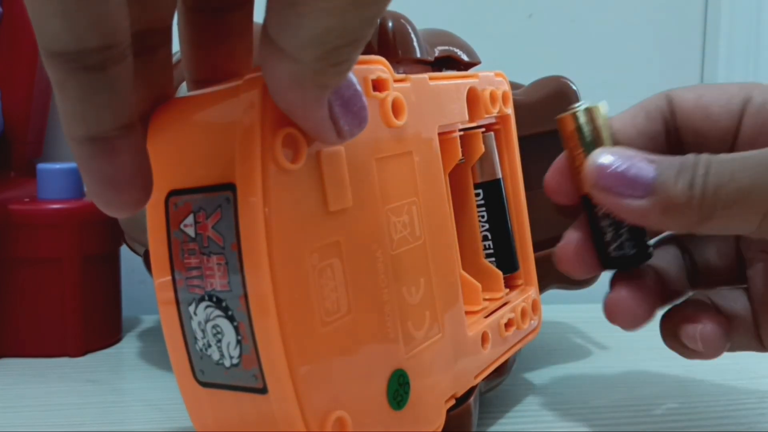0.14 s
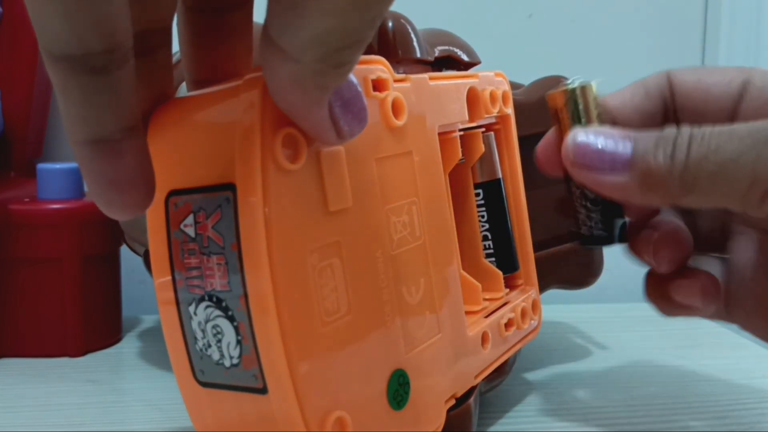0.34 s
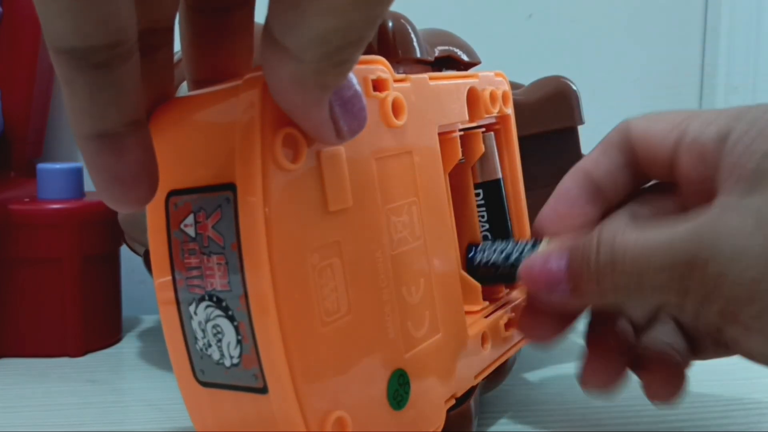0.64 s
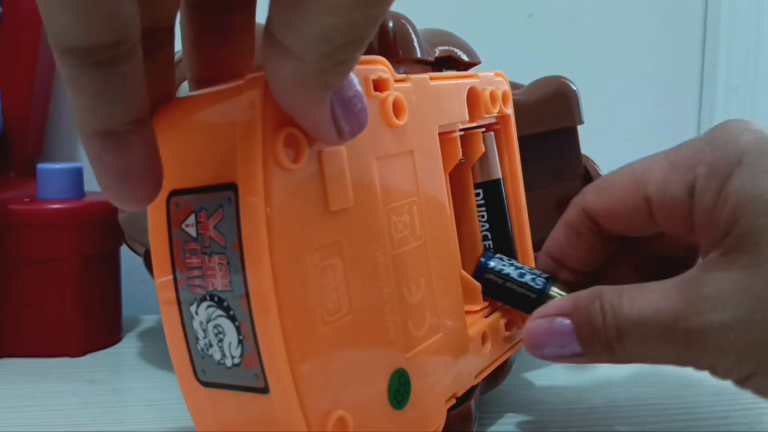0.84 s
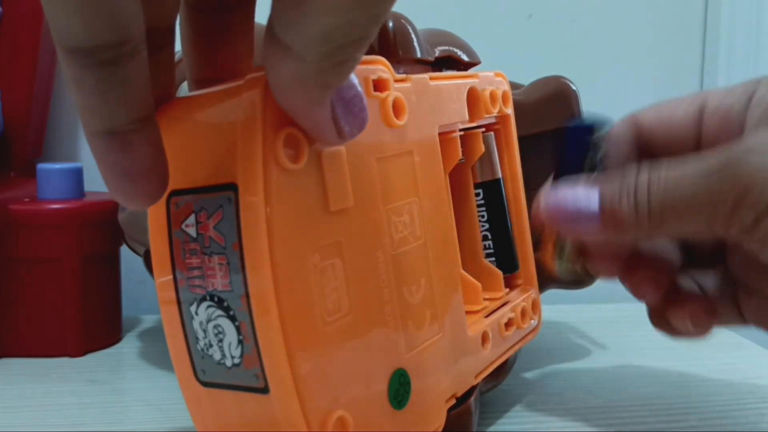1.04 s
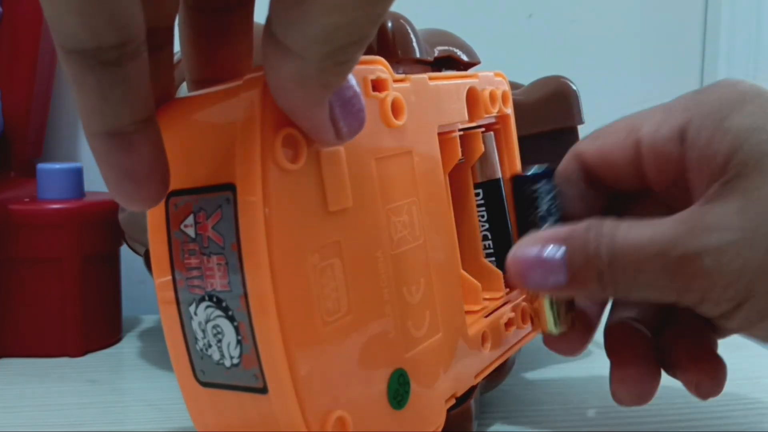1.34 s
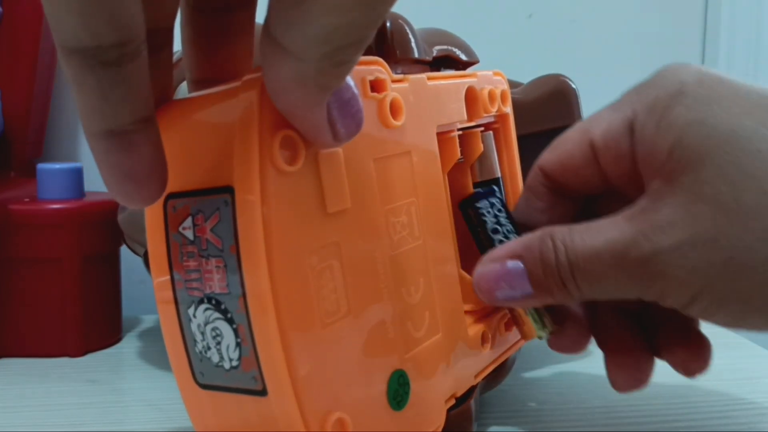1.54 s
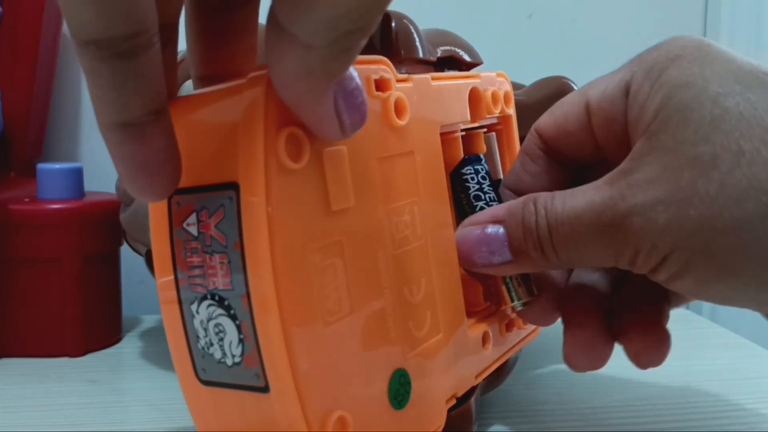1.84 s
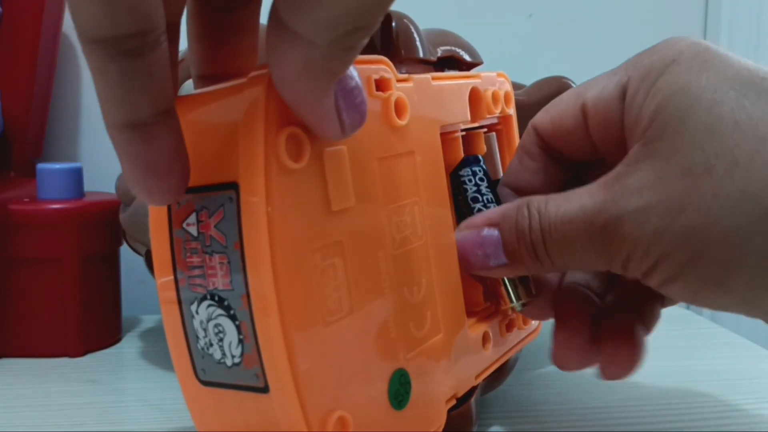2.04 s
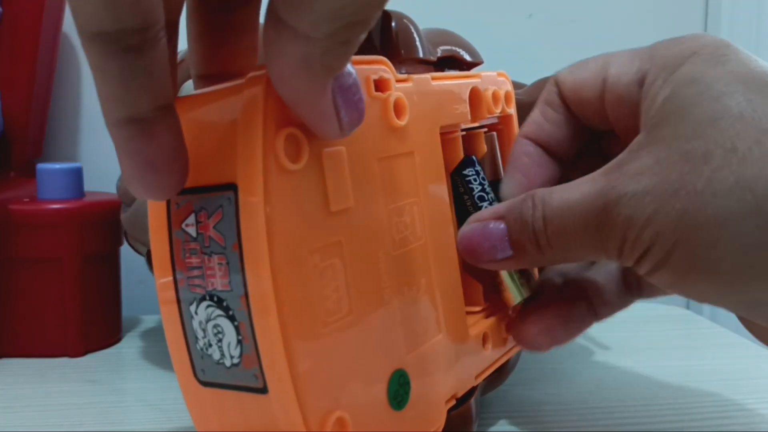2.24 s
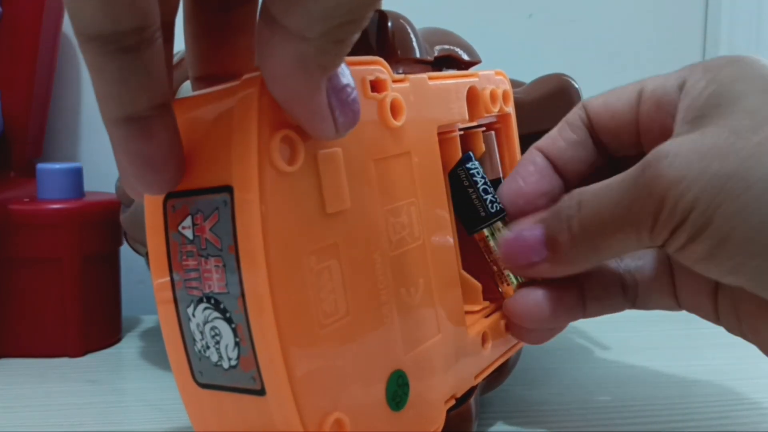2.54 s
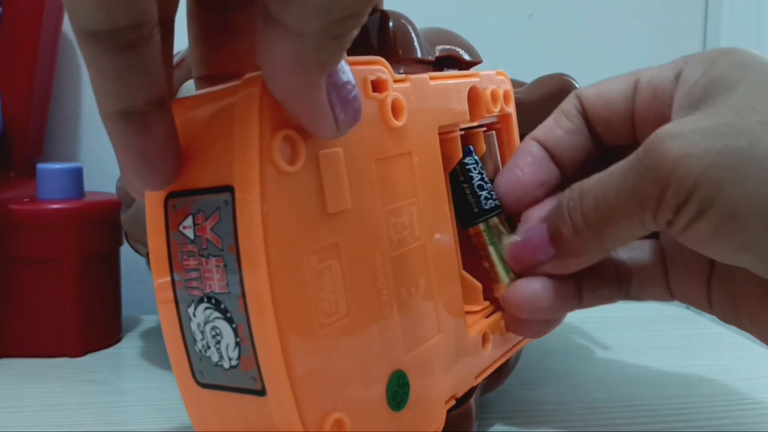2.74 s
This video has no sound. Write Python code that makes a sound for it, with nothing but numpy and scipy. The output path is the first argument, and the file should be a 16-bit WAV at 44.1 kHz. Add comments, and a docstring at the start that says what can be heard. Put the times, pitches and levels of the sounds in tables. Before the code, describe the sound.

A battery taps, scrapes and snaps into a hollow plastic toy in a small room.

```python
"""A small room: a battery is fumbled into a hollow plastic toy, close to the microphone.
Its metal can taps and scrapes on the ribs, ringing the plastic, and snaps past the contact spring.
Fingers shift and rub on the shell, and the toy knocks on the table with a thud and a hollow boom.
Behind it, a faint low hum swells and fades over quiet room air."""
import sys
import numpy as np
from scipy import signal
from scipy.fft import rfft, irfft
from scipy.io import wavfile
from scipy.ndimage import uniform_filter1d

SR = 44100
rng = np.random.default_rng(int(sys.argv[2]) if len(sys.argv) > 2 else 0)


def dump(signal):
    """Clip the signal to [-1, 1] and save it as 16-bit WAV at the path in sys.argv[1]."""
    limited = np.clip(np.atleast_2d(signal).T, -1, 1)
    pcm = np.round(limited * 32767).astype(np.int16)
    wavfile.write(sys.argv[1], SR, pcm)


N = 127890
TIME = np.arange(N) / SR
HUM_HZ = 101.5
CONTACT_S = 0.001294   # mean time over which the plastic smears a click

# Table levels are relative.
# battery strikes: (time [s], shell [dB], compartment walls [dB], ribs [dB], metal contact [dB])
STRIKES = [(0.242, -82, -70, -69.5, -56), (0.503, -43, -49, -48, -58), (0.5212, -28, -58, -34, -27),
           (0.5409, -31, -35, -34, -35), (0.545, -22.5, -34, -39, -30.5), (0.549, -23, -29, -31, -33),
           (0.671, -39.5, -40, -58, -61), (0.68, -45.5, -43.5, -64, -71), (0.7704, -36, -38.5, -56, -52.5),
           (0.7751, -28, -45, -73, -65), (0.7975, -45, -28, -37.5, -44), (0.8459, -52.5, -74, -60, -51.5),
           (1.447, -38.5, -39.5, -53, -53.5), (1.611, -48, -47, -55, -54), (1.7501, -52, -48, -54, -51),
           (1.87, -55, -38, -41, -38.5), (1.971, -59, -48.5, -59, -62), (2.004, -56, -45, -58, -65),
           (2.093, -45, -39, -41.5, -54), (2.1142, -15, -18, -28.5, -27), (2.124, -20, -49, -27.5, -25),
           (2.1365, -8, -14, -26, -20.5), (2.284, -45.5, -43, -57.5, -60.5), (2.3894, -41.5, -44, -70, -53),
           (2.4935, -60, -40, -55.5, -58), (2.5577, -65, -51.5, -39, -34),
           (2.6394, -37.5, -28.5, -36, -34.5), (2.645, -31.5, -33, -51, -35.5),
           (2.6497, -23, -36.5, -44, -53), (2.723, -33, -75, -69, -75), (2.7314, -30.5, -36, -45, -44),
           (2.863, -46, -46, -64, -78)]


def from_db(db):
    """Decibels to gain."""
    return 10 ** (np.asarray(db) / 20)


def rms_one(x):
    """Scale to rms 1."""
    return x / np.sqrt(np.mean(x ** 2) + 1e-20)


def unit_energy(x):
    """Scale each channel to energy 1."""
    return x / np.sqrt(np.sum(x ** 2, axis=-1, keepdims=True) + 1e-20)


def peak_one(x):
    """Scale the strongest 4 ms to rms 1."""
    return x / np.sqrt(uniform_filter1d(x ** 2, size=176).max())


def at_hz(points, hz):
    """Read a table on a log-frequency axis."""
    knots_hz, values = np.transpose(points)
    return np.interp(np.log(np.maximum(hz, 1)), np.log(knots_hz), values)


def band(x, low_hz, high_hz, order=2):
    """Causal band-pass."""
    return signal.sosfilt(signal.butter(order, [low_hz, high_hz], "band", fs=SR, output="sos"), x)


def decay(t, t60_s):
    """Exponential decay, 60 dB in t60_s."""
    return np.exp(-np.log(1000) * t / t60_s)


def drift(rate_hz):
    """Slow random wander, rms 1."""
    hz = np.arange(N // 2 + 1) * SR / N
    return rms_one(irfft(rfft(rng.standard_normal(N)) / (1 + (hz / rate_hz) ** 2), N))


def add(track, start_s, sound):
    """Mix a sound into a track."""
    i = max(int(start_s * SR), 0)
    track[i:i + len(sound)] += sound[:max(N - i, 0)]


def struck(modes, t, spread_db=2.5):
    """Decaying modes, their strengths varying from blow to blow."""
    strengths = from_db(rng.normal(0, spread_db, len(modes)))
    return sum(gain * from_db(db) * np.sin(2 * np.pi * hz * t) * decay(t, t60_s)
               for gain, (hz, db, t60_s) in zip(strengths, modes))


def smear(mean_delay_s, size=1024):
    """Bending waves spread a click: each frequency arrives at its own time."""
    knots = np.abs(1 + 0.536 * rng.standard_normal(size // 32))
    positions = np.linspace(0, len(knots) - 1, size // 2 + 1)
    delay_s = mean_delay_s * np.interp(positions, np.arange(len(knots)), knots)
    return irfft(np.exp(-2j * np.pi * np.cumsum(delay_s) * SR / size))[:size // 2]


def placed(x, pan_db, lag_s=0.001):
    """Pan (positive is left); sound reaches the farther, left microphone port later."""
    left, right = unit_energy(from_db([pan_db / 2, -pan_db / 2])) * np.sqrt(2)
    return np.array([left * np.interp(TIME - lag_s / 2, TIME, x),
                     right * np.interp(TIME + lag_s / 2, TIME, x)])


def in_room(x, hz, pan_db, room_db):
    """Direct sound, dense early reflections and a weaker late tail."""
    # late tail: (frequency [Hz], t60 [s])
    tail_t60 = [(200, 0.15), (1000, 0.43), (4000, 0.22), (12000, 0.24)]
    early_t60_s, late_db, build_s = 0.14, -18, 0.008
    t = TIME[:SR // 2]
    envelope = decay(t, early_t60_s) + from_db(late_db) * decay(t, at_hz(tail_t60, hz))
    envelope *= np.minimum(t / build_s, 1) ** 2
    echoes = unit_energy(rng.standard_normal((2, len(t))) * envelope)
    direct = placed(x, pan_db)
    return direct + from_db(room_db) * signal.fftconvolve(direct, echoes, axes=1)[:, :N]


def stereo_noise(spectrum, hum_dip_db=0):
    """Coloured noise, alike on both sides in the bass, with an optional dip at the hum."""
    # left-right likeness: (frequency [Hz], correlation [0..1])
    likeness = [(40, 0.3), (120, 1), (300, 0.074), (1000, .02), (10000, .02)]
    hz = np.arange(N // 2 + 1) * SR / N
    mid, side = rfft(rng.standard_normal((2, N)))
    alike = at_hz(likeness, hz)
    pair = np.sqrt(1 + alike) * mid + np.sqrt(1 - alike) * side * [[1], [-1]]
    dip_db = hum_dip_db * np.exp(-((hz - HUM_HZ) / 35) ** 2)
    return rms_one(irfft(from_db(at_hz(spectrum, hz) + dip_db) * pair, N))


def air():
    """Steady, bass-heavy room noise."""
    # room air: (frequency [Hz], density [dB])
    spectrum = [(15, -50.5), (25, -17), (64, -20), (78, -6), (102, 2.5), (141, -21), (270, -21.5),
                (326, -23.5), (607, -35.5), (1400, -38), (2110, -45), (4370, -47.5), (6920, -53.5),
                (9070, -46.5), (16000, -65)]
    return from_db(-61) * stereo_noise(spectrum, hum_dip_db=-17)


def hum():
    """A low hum swells and fades, with faint wavering tones above it."""
    # hum envelope, two consecutive runs of (time [s], level [dB])
    swells = [
        [(0.0, -59.5), (0.42, -56), (0.492, -81), (0.56, -53), (0.766, -67), (0.834, -51), (0.918, -46.5),
         (1.102, -78.5), (1.118, -58), (1.394, -46), (1.44, -95)],
        [(1.46, -65), (1.56, -60.5), (1.924, -53.5), (1.964, -82), (2.092, -70), (2.136, -48.5), (2.354, -52.5),
         (2.382, -59.5), (2.618, -65), (2.778, -55.5), (2.9, -64)],
    ]
    # room tones: (frequency [Hz], level [dB], width [Hz])
    tones = [(210.7, -75, 20), (261, -61.5, 6.8), (302, -70, 4.7), (580, -69.5, 14), (4300, -82, 36)]
    wander_hz = 1.076 * drift(2.44)
    phase = 2 * np.pi * np.cumsum(HUM_HZ + wander_hz) / SR
    level_db = np.interp(TIME, *np.vstack(swells).T) - 0.5
    out = np.sqrt(2) * np.sin(phase) * from_db(level_db)
    for hz, db, width_hz in tones:
        angle = 2 * np.pi * hz * TIME
        out += from_db(db) * (drift(width_hz) * np.sin(angle) + drift(width_hz) * np.cos(angle))
    return placed(out, pan_db=7.5)


def fingers():
    """Fingers shift on the hollow toy: a low, uneven rustle."""
    # handling envelope: (time [s], level [dB])
    envelope = [(0, -73.5), (1.45, -71.5), (1.66, -53), (1.8, -63.5), (1.97, -62), (2.3, -53), (2.5, -75),
                (2.74, -59.5), (2.9, -58)]
    # handling noise: (frequency [Hz], density [dB])
    spectrum = [(60, -22.5), (105, -4), (150, -3), (225, -2), (400, -13.5), (600, -13), (900, -19),
                (1500, -25.5), (6000, -48.5)]
    rustle = stereo_noise(spectrum)
    flutter_db = 1.8 * drift(25)
    return rustle * from_db(np.interp(TIME, *np.transpose(envelope)) + flutter_db)


def bumps():
    """Pushes from battery and fingers knock the toy on the table: low thud, hollow boom."""
    # table knocks: (time [s], thud [dB], boom [dB])
    knocks = [(.546, -35, -38.5), (.556, -39, -44.5), (0.675, -53, -54), (0.777, -49.5, -46),
              (1.456, -69, -50.5), (1.611, -52, -66), (1.657, -57, -62), (1.76, -54, -51),
              (1.885, -76, -51.5), (2.115, -47.5, -51), (2.141, -37.5, -35), (2.293, -56, -48),
              (2.399, -83, -66), (2.578, -60, -46.5), (2.653, -66, -49.5), (2.728, -49, -57.5)]
    # modes of the toy on the table: (frequency [Hz], level [dB], t60 [s])
    modes = [(157, -9.5, 0.085), (213.4, 1, 0.093), (270.4, -7, 0.18), (347, -1, 0.057), (437, -4, .06),
             (522, -1.5, 0.049), (587, 0, 0.069), (674, -3, 0.03), (800, 0, 0.039)]
    split_hz = 400
    thud_modes = [mode for mode in modes if mode[0] < split_hz]
    boom_modes = [mode for mode in modes if mode[0] >= split_hz]
    thuds, booms = np.zeros((2, N))
    t = TIME[:SR // 3]
    for time_s, thud_db, boom_db in knocks:
        add(thuds, time_s, from_db(thud_db + 4.5) * struck(thud_modes, t))
        add(booms, time_s, from_db(boom_db - 1) * struck(boom_modes, t))
    return (in_room(band(thuds, 120, split_hz, order=3), hz=213.4, pan_db=6.5, room_db=-0.5)
            + in_room(band(booms, split_hz, 990), hz=split_hz, pan_db=3, room_db=2.5))


def spring():
    """The contact spring pings faintly when the battery catches it."""
    # spring plucks: (time [s], level [dB])
    plucks = [(1.871, -57), (2.4938, -50.5), (2.5561, -43.5)]
    # spring modes: (frequency [Hz], level [dB], t60 [s])
    modes = [(2060, -0.5, 0.134), (2820, 0.5, 0.055), (3200, 3.5, 0.067), (3395, 0.5, 0.087),
             (3820, -2, 0.057), (5350, -9, 0.068)]
    out = np.zeros(N)
    for time_s, db in plucks:
        ping = signal.fftconvolve(struck(modes, TIME[:SR // 6]), smear(CONTACT_S))
        add(out, time_s, from_db(db) * ping)
    return in_room(band(out, 1500, 5700), hz=3200, pan_db=-1, room_db=-13.5)


def cracks():
    """The harder the metal strikes, the more of its energy lies in the top treble."""
    low_hz, pivot_db, growth = 11250, -23, 0.62
    out = np.zeros(N)
    for time_s, *_, metal_db in STRIKES:
        db = metal_db - 14.5 + growth * (metal_db - pivot_db)
        click = band(smear(mean_delay_s=0.0025), low_hz, 1.25 * low_hz)
        add(out, time_s, from_db(db) * peak_one(click))
    return in_room(out, low_hz, pan_db=-12.5, room_db=-14)


def ringing(low_hz, high_hz, dense_db, dense_t60_s):
    """Impulse response of one part of the toy: its modes plus a short dense ring."""
    # toy modes: (frequency [Hz], level [dB], t60 [s])
    toy_modes = [(735, -13.5, .05), (843.5, -7.5, 0.092), (879, 15, 0.014), (939.6, 4, 0.043),
                 (1080.6, -15.5, 0.15), (1260, -5.5, 0.057), (1822, -2, 0.026), (1955, 13, .011),
                 (1949, -10.5, 0.056), (2166, -11.5, 0.04), (2370, -2, 0.023), (3530, -4, 0.015),
                 (4404, -3, 0.035), (5114, 7, 0.014), (6010, -7, .035), (7100, -4, 0.0057),
                 (9320, -1, 0.0096), (10030, 2, 0.0067)]
    t = TIME[:SR // 12]
    modal = struck([mode for mode in toy_modes if low_hz < mode[0] < high_hz], t)
    modal = band(modal, low_hz, high_hz, order=1)
    dense = band(rng.standard_normal(len(t)) * decay(t, dense_t60_s), low_hz, high_hz, order=3)
    return unit_energy(modal) + from_db(dense_db) * unit_energy(dense)


def scrapes(column, part):
    """The sliding can, and once a faintly rubbing finger, makes a run of tiny uneven slips."""
    # slides; the one at 1.066 s is the finger:
    # (start [s], length [s], shell [dB], compartment walls [dB], ribs [dB], contact [dB])
    slides = [(0.503, 0.079, -37, -43.5, -45.5, -51), (0.665, .04, -45, -54, -68, -62.5),
              (0.732, 0.048, -64.5, -58.5, -82, -56), (.782, 0.022, -49, -36.5, -45, -56),
              (1.066, .07, -86, -84, -79, -70), (1.523, 0.075, -65, -51, -67.5, -64),
              (2.015, 0.038, -59, -48, -57, -61), (2.075, 0.061, -49.5, -40.5, -56, -58),
              (2.107, 0.025, -27, -28, -35, -40), (2.268, 0.084, -54.5, -53, -67, -70.5),
              (2.476, 0.023, -75.5, -52.5, -63, -71), (2.559, 0.036, -47, -52, -68, -64),
              (2.632, 0.025, -42, -33, -45.5, -55), (2.704, 0.048, -44, -58, -68, -74),
              (2.772, 0.059, -57.5, -58, -74, -77)]
    slips_per_s, spread_db = 1400, 3
    t = TIME[:SR // 6]
    out = np.zeros(N)
    for start_s, length_s, *levels_db in slides:
        chance, size, sign = rng.random((3, len(t)))
        swell = np.sqrt(np.sin(np.pi * np.minimum(t / length_s, 1)).clip(0))
        strength = from_db(-spread_db * np.log(size.clip(0.03)))
        slips = (chance < slips_per_s / SR) * strength * np.sign(sign - 0.5) * swell
        scrape = np.sqrt(length_s * SR) * unit_energy(signal.fftconvolve(slips, ringing(*part)))
        add(out, start_s, from_db(levels_db[column] - 1) * scrape)
    return out


def graze(length_s=0.005, db=-12):
    """The can rubs the plastic just before it strikes."""
    size = int(length_s * SR)
    return from_db(db) * unit_energy(rng.standard_normal(size) * np.linspace(0, 1, size))


def taps(column, part):
    """Each strike rings a part with a graze, then a smeared click."""
    out = np.zeros(N)
    for time_s, *levels_db in STRIKES:
        lead = graze()
        contact = np.concatenate([lead, smear(CONTACT_S)])
        tap = peak_one(signal.fftconvolve(ringing(*part), contact))
        add(out, time_s - len(lead) / SR, from_db(levels_db[column]) * tap)
    return out


def battery():
    """As the battery goes in, taps and scrapes sound through every part of the toy."""
    # shell, compartment walls, ribs, metal contact:
    # (low [Hz], high [Hz], level [dB], dense ring re modes [dB], its t60 [s], pan [dB], room [dB])
    parts = [(579, 1590, -4, -9, .022, 10.5, -10), (1728, 2457, -2, -6, 0.023, 9, -10),
             (2800, 6480, -2.18, 4.1, 0.022, -3.5, -5), (7220, 10700, -4.13, -4.5, 0.024, -11, -9)]
    out = np.zeros((2, N))
    for column, (low_hz, high_hz, db, dense_db, dense_t60_s, pan_db, room_db) in enumerate(parts):
        part = low_hz, high_hz, dense_db, dense_t60_s
        contacts = taps(column, part) + scrapes(column, part)
        out += from_db(db) * in_room(contacts, np.sqrt(low_hz * high_hz), pan_db, room_db)
    return out


def scene():
    """Fingers, battery and toy over the hum and room air."""
    return fingers() + battery() + cracks() + spring() + bumps() + hum() + air()


def record(dry):
    """Duller left channel, soft peak limit, steep treble cut."""
    left_top_hz, ceiling, cutoff_hz = 9170, 0.89, 15900
    left = signal.sosfilt(signal.butter(6, left_top_hz, fs=SR, output="sos"), dry[0])
    both = np.array([left, dry[1]])
    rounded = both / (1 + (both / ceiling) ** 8) ** (1 / 8)
    return signal.sosfilt(signal.ellip(10, 0.2, 80, cutoff_hz, fs=SR, output="sos"), rounded)


dry = scene()
out = record(dry)
dump(out)
```